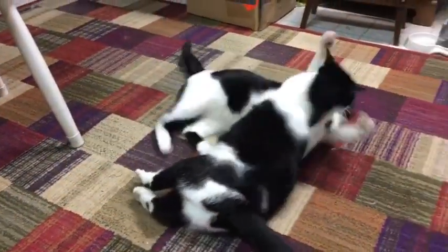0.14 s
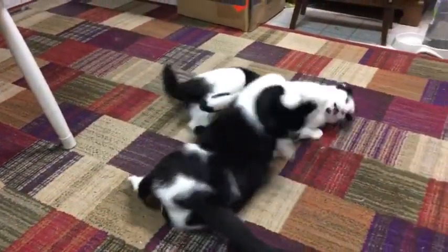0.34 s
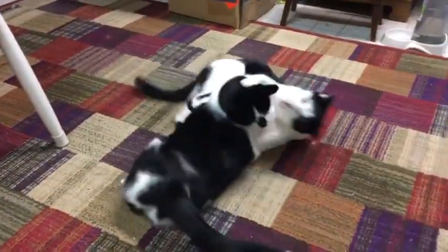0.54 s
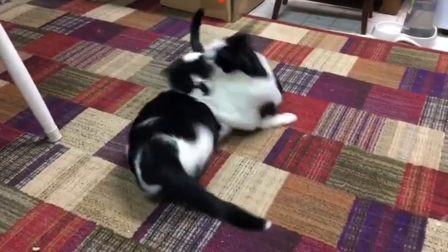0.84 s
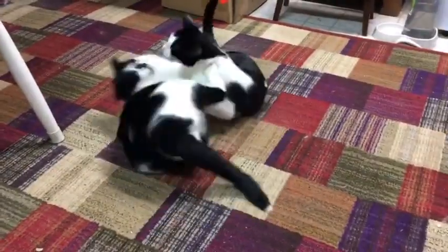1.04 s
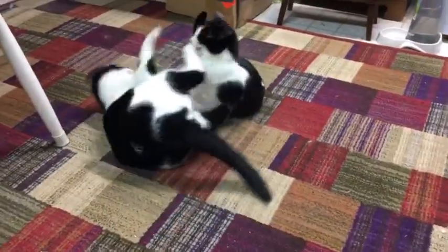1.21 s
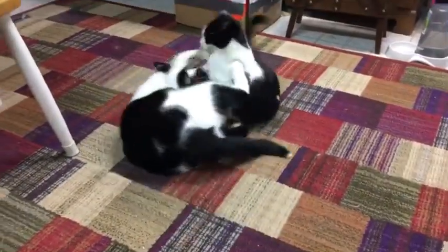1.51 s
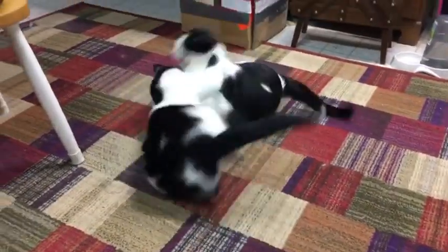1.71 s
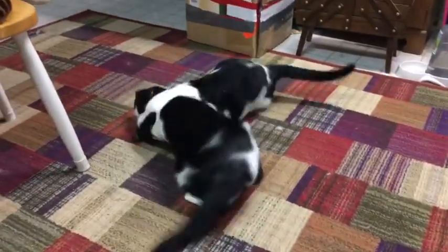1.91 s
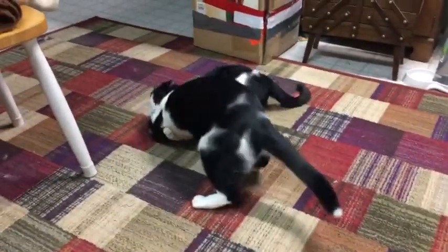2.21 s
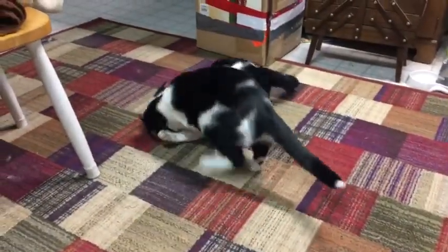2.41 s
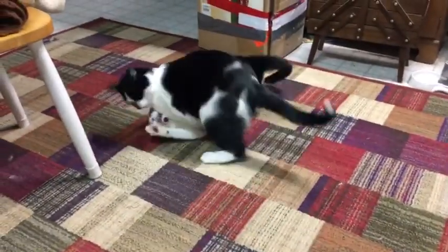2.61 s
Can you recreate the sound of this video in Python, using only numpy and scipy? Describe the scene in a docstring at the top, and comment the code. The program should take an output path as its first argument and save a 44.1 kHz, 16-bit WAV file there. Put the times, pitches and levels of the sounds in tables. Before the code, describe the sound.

Wrestling cats thud softly on a carpeted floor, strongest near the start; claw snaps and scratchy drags follow around one second and again later, over low room rumble and faint hiss, single-channel handheld microphone.

```python
"""Two cats wrestle on a rug in a quiet room: bodies and paws thud softly as short low swings that
ring the floor boards, and rolling bodies add filtered-noise rumble. Fur brushes past as soft noise.
Claws tear loose in damped sine snaps, drag through the pile as a crackle of random impulses, and
click as bright noise bursts. Thuds and claws get a short room tail over a steady rumble and hiss."""
import sys
import numpy as np
from scipy import signal
from scipy.fft import rfft, irfft
from scipy.io import wavfile

SR = 44100
rng = np.random.default_rng(int(sys.argv[2]) if len(sys.argv) > 2 else 0)


def dump(signal):
    """Clip the signal to [-1, 1] and save it as 16-bit WAV at the path in sys.argv[1]."""
    limited = np.clip(np.atleast_2d(signal).T, -1, 1)
    pcm = np.round(limited * 32767).astype(np.int16)
    wavfile.write(sys.argv[1], SR, pcm)


N = 121275

# Tone of the quiet room, before rumble and hiss are split and levelled: [f/Hz, level/dB]
ROOM_TONE = [(20, -13.5), (30, -17.5), (40, -1.5), (51, 10), (75, 3), (118, -5.5), (146, -5.5),
             (200, -13.5), (271, -14.5), (373, -19), (450, -23.5), (833, -28), (1120, -25.5), (1540, -29.5),
             (3010, -31.5), (5010, -38), (6500, -37.5), (15000, -43.5)]
# Bodies and paws landing at varied pitches and levels, with two quick echoes of the big landing at 0.228 s (the
# rows at 0.2431 and 0.255 s), before the floor colours them: [t/s, f/Hz, peak level/dB]
LANDINGS = [(0.01, 70, -47.5), (0.033, 65.8, -45.5), (.228, 185.3, -22), (0.2431, 161, -29.5),
            (0.255, 183, -28), (.297, 111.7, -52), (.321, 204, -45.5), (0.335, 175, -43.5),
            (0.174, 190, -57), (.402, 88, -52.5), (0.491, 177, -55.5), (0.754, 257, -52),
            (0.813, 193, -48.5), (0.844, 83, -54.5), (.972, 232, -52), (1.023, 237, -44), (1.034, 169, -51),
            (1.705, 128, -46), (1.7195, 263, -41.5), (1.737, 94.4, -48.5), (1.776, 83.3, -51),
            (1.801, 125, -44.5), (1.8187, 87.2, -38.5), (1.841, 148.2, -51), (1.873, 85.6, -57.5),
            (1.931, 250, -47.5), (1.939, 80.4, -49), (2.09, 141, -57), (2.111, 140, -58.5),
            (2.231, 53.5, -61), (2.451, 305.6, -47.5), (2.458, 144, -42.5), (2.486, 96.4, -43),
            (2.499, 133, -48.5), (2.512, 114, -50.5), (2.592, 91, -57), (2.676, 272, -59)]
# Bodies rolling and shoving, before the floor colours them: [peak t/s, rise t/s, fall t/s, level/dB]
ROLLS = [(.02, 0.07, 0.017, -64.5), (.47, 0.039, 0.2, -68), (0.801, 0.063, 0.047, -61.5),
         (1.009, 0.022, .02, -55), (1.71, 0.032, 0.054, -54.5), (1.85, 0.069, 0.055, -62),
         (2.5, 0.021, .03, -69)]
# Spectrum of the rolling: [f/Hz, level/dB]
ROLL_COLOUR = [(30, -19), (60, -5), (160, 0.5), (220, -5.5), (280, -0.5), (380, -8), (480, -18.5),
               (1000, -24.5), (3000, -50.5)]
# How the floor carries landings and rolling: [f/Hz, level/dB]
FLOOR_COLOUR = [(30, -2.5), (55, 3), (100, 1), (130, 1), (160, 0), (200, 0.5), (240, -1.5), (280, -8.5),
                (315, -1), (370, 0.5), (600, -0.5)]
# Ringing floor boards under the rug, levels relative to each other: [f/Hz, level/dB, 60 dB decay t/s]
FLOOR_MODES = [(54, -4.5, 0.28), (72.62, -9, 0.54), (85, -10.5, 0.14), (126.1, -6.5, 0.12),
               (156.4, -14, 0.64), (202.26, -5.5, 0.31), (241, -1, 0.38), (336, -7, 0.083),
               (388.4, -13, 0.16)]
# Fur sliding on fur and rug: [peak t/s, rise t/s, fall t/s, level/dB]
BRUSHES = [(.03, 0.056, 0.22, -74), (.17, 0.023, 0.033, -74.5), (0.361, 0.041, .05, -73),
           (.58, 0.021, 0.078, -73.5), (1.42, 0.105, 0.069, -76), (1.68, 0.062, 0.04, -72),
           (2.19, 0.065, 0.096, -79), (2.382, 0.011, 0.017, -70), (2.62, 0.23, 0.33, -77.5)]
# Spectrum of the brushing: [f/Hz, level/dB]
FUR_COLOUR = [(300, 1), (1000, 1.5), (3000, -1), (5000, -8), (9000, -12.5), (15000, -22.5)]
# One long slide over the rug that swells and stops: [t/s, level/dB]
SLIDE = [(.7, -90), (.85, -73.5), (.99, -71), (1.05, -83)]
# Spectrum of the slide: [f/Hz, level/dB]
SLIDE_COLOUR = [(1500, 12), (4000, 4), (9000, 4.5), (15000, -5.5)]
# Claws snapping free of threads, before the rug colours them: [t/s, level/dB, f/Hz]
SNAPS = [(.7225, -49.5, 1980), (.735, -49.5, 1670), (.749, -63, 1700), (.752, -45.5, 1380),
         (0.7882, -46, 1930), (0.794, -66, 2000), (.923, -45.5, 1800), (.946, -54, 1400),
         (.9655, -44, 1112), (.9712, -48.5, 720), (0.9794, -41, 1080), (0.9909, -41, 1390),
         (0.995, -45, 1190), (1.002, -53, 1110), (1.009, -38.5, 1440), (1.021, -51.5, 1070),
         (1.0288, -49, 910), (1.663, -49, 1580), (1.6768, -39, 2760), (1.6815, -67, 2200),
         (1.6888, -46.5, 2170), (1.7085, -44, 1160), (1.72, -48.5, 860), (1.769, -54, 1300),
         (1.79, -50.5, 2000), (1.875, -67, 1017), (2.479, -60, 1950), (2.668, -60, 690)]
# Paws dragging through the pile, before the rug colours them:
# [peak t/s, rise t/s, fall t/s, level/dB, centre f/Hz]
DRAGS = [(.738, 0.016, 0.031, -65, 2080), (.794, 0.0058, .03, -64.5, 1840), (.845, 0.0092, 0.018, -71, 990),
         (.94, 0.017, .025, -63.5, 1880), (0.996, 0.023, 0.038, -61.5, 950),
         (1.451, 0.0085, 0.0087, -64.5, 2870), (1.655, 0.016, 0.024, -65.5, 1400),
         (1.682, 0.0046, 0.021, -60, 2370), (1.715, 0.0085, 0.034, -72, 740),
         (1.78, 0.0272, 0.044, -67.5, 1410), (1.88, 0.007, .015, -68, 2520),
         (2.348, 0.025, 0.014, -71, 1314), (2.729, 0.0077, 0.018, -64.5, 2410)]
# What the rug lets out of snaps and drags: [f/Hz, level/dB]
RUG_COLOUR = [(100, 3), (250, -8), (600, 8), (800, 0.5), (1400, 2.5), (2000, -0.5), (3000, -2.5),
              (4000, -6.5), (4900, -13), (7000, -14.5), (15000, -17.5)]
# Claw tips clicking, noise level before the high-pass: [t/s, level/dB]
TICKS = [(.9898, -58), (1.0085, -53.5), (1.257, -53.5), (1.6759, -62), (1.6823, -62), (1.6914, -58),
         (2.384, -76), (2.553, -62.5), (2.634, -61)]

RUMBLE_DB, HISS_DB, SPLIT_HZ = -66.5, -74, 330
PUSH_CYCLES = 0.65  # half-width of a landing's swing, in cycles of its pitch
KNOCK_HZ, KNOCK_S, KNOCK_DB = 387, 0.0023, -26.5  # level relative to the landing
RING_DB, THUMP_ROOM_DB, THUMP_T60_S = -57, -7, 0.29
SNAP_CYCLES = 1  # cycles in which a twang falls to 1/e
SCUFF_S, SCUFF_DB = 0.0018, -6.5  # level relative to the snap
CLAW_OCTAVES = 1.93  # bandwidth of scuffs and drags
THREADS_PER_S, THREAD_SPREAD_DB = 1500, 4.5
CLAW_ROOM_DB, TICK_ROOM_DB, CLAW_T60_S = -5.5, -8, 0.22
TICK_S, TICK_HZ = 0.00039, 3900  # decay time, high-pass corner
TOP_HZ = 15300


def undb(db):
    """Decibels to gain."""
    return 10 ** (np.asarray(db) / 20)


def unit(x):
    """Scale to rms 1."""
    return x / np.sqrt(np.mean(x ** 2))


def noise():
    """White noise for the whole scene."""
    return rng.standard_normal(N)


def convolve(x, response):
    """Pass a sound through an impulse response."""
    return signal.fftconvolve(x, response)[:N]


def colour(x, points):
    """Minimum-phase filter through (Hz, dB) points, interpolated over log frequency."""
    size = 8192
    hz, db = np.array(points, float).T
    bins = np.fft.rfftfreq(size, 1 / SR) + 1  # the offset avoids log(0)
    gain = undb(np.interp(np.log(bins), np.log(hz), db))
    # Folding the cepstrum forward makes the response causal
    cepstrum = irfft(np.log(gain))
    cepstrum[1:size // 2] *= 2
    cepstrum[size // 2 + 1:] = 0
    return convolve(x, irfft(np.exp(rfft(cepstrum))))


def cut(x, hz, kind, order=2):
    """Butterworth low-pass, high-pass or band-pass."""
    return signal.sosfilt(signal.butter(order, hz, kind, fs=SR, output="sos"), x)


def band(x, hz, octaves):
    """Broad resonance around a centre."""
    edges = hz * 2 ** (np.array([-.5, .5]) * octaves)
    return cut(x, np.minimum(edges, SR / 2 - 1), "band", order=1)


def room(x, t60, wet_db, build_s):
    """Direct sound plus a diffuse tail that builds up and dies away."""
    t = np.arange(N) / SR
    decay = np.exp(-np.log(1000) * t / t60)
    build = 1 - np.exp(-(t / build_s) ** 2)
    tail = noise() * decay * build
    return x + undb(wet_db) * convolve(x, tail / np.sqrt(np.sum(tail ** 2)))


def swells(t, table):
    """Level of strokes that each rise to a peak and fall away, summed as power."""
    power = np.zeros(len(t))
    for at, rise, fall, db in table:
        exponent = np.where(t < at, ((at - t) / rise) ** 2 / 2, (t - at) / fall)
        power += (undb(db) * np.exp(-exponent)) ** 2
    return np.sqrt(power)


def room_tone():
    """Steady low rumble and faint hiss: coloured noise either side of a split frequency."""
    rumble = unit(cut(colour(noise(), ROOM_TONE), SPLIT_HZ, "low"))
    hiss = unit(cut(colour(noise(), ROOM_TONE), SPLIT_HZ, "high"))
    return undb(RUMBLE_DB) * rumble + undb(HISS_DB) * hiss


def thumps(t):
    """Padded landings rock the floor with a faint knock; rolling rumbles; the boards ring briefly."""
    push = unit(colour(noise(), ROLL_COLOUR)) * swells(t, ROLLS)
    for at, hz, db in LANDINGS:
        near = np.abs(t - at) < 10 / hz
        age = t[near] - at
        rocking = np.cos(2 * np.pi * hz * age) * np.exp(-(hz * age / PUSH_CYCLES) ** 2)
        # The knock starts just ahead and peaks with the landing
        since = np.maximum(age / KNOCK_S + 1, 0)
        knock = np.cos(2 * np.pi * KNOCK_HZ * age) * since * np.exp(1 - since)
        push[near] += undb(db) * (rocking + undb(KNOCK_DB) * knock)
    push = colour(push, FLOOR_COLOUR)
    boards = np.zeros(N)
    for hz, db, t60 in FLOOR_MODES:
        boards += undb(db) * np.cos(2 * np.pi * hz * t) * np.exp(-np.log(1000) * t / t60)
    ringing = undb(RING_DB) * convolve(push, boards)
    return room(push + ringing, THUMP_T60_S, THUMP_ROOM_DB, build_s=0.011)


def fur(t):
    """Coats brush as soft swelling noise, with one longer, brighter slide."""
    brushes = unit(colour(noise(), FUR_COLOUR)) * swells(t, BRUSHES)
    at, db = np.array(SLIDE).T
    sliding = (t > at[0]) & (t < at[-1])
    slide_level = undb(np.interp(t, at, db)) * sliding
    slide = unit(colour(noise(), SLIDE_COLOUR)) * slide_level
    return brushes + slide


def claw_snaps(t):
    """A thread let go gives a damped twang and a short noisy scuff around the same pitch."""
    snaps = np.zeros(N)
    age = t[:SR // 20]
    for at, db, hz in SNAPS:
        twang = np.sin(2 * np.pi * hz * age) * np.exp(-hz * age / SNAP_CYCLES)
        grain = unit(band(rng.standard_normal(len(age)), hz, CLAW_OCTAVES))
        scuff = grain * np.exp(-age / SCUFF_S)
        start = int(at * SR)
        snaps[start:start + len(age)] += undb(db) * (twang + undb(SCUFF_DB) * scuff)
    return snaps


def claw_drags(t):
    """Many threads plucked at random, as impulses of uneven size, crackle around each drag's pitch."""
    signs = rng.choice([-1, 1], N)
    spread = np.minimum(rng.exponential(size=N), 3)
    sizes = signs * undb(THREAD_SPREAD_DB * spread)
    threads = (rng.random(N) < THREADS_PER_S / SR) * sizes
    drags = np.zeros(N)
    for at, rise, fall, db, hz in DRAGS:
        drags += unit(band(threads, hz, CLAW_OCTAVES)) * swells(t, [(at, rise, fall, db)])
    return drags


def claws(t):
    """Snaps and the crackle of drags, coloured by the rug and followed by the room's tail."""
    rug = colour(claw_snaps(t) + claw_drags(t), RUG_COLOUR)
    return room(rug, CLAW_T60_S, CLAW_ROOM_DB, build_s=0.001)


def ticks(t):
    """Claw tips click: tiny high-passed noise bursts that start at once and decay."""
    level = np.zeros(N)
    for at, db in TICKS:
        level += undb(db) * (t >= at) * np.exp(-np.abs(t - at) / TICK_S)
    # The tiny offset keeps the filter clear of vanishingly small numbers
    clicks = cut(noise() * level + 1e-18, TICK_HZ, "high", order=1)
    return room(clicks, CLAW_T60_S, TICK_ROOM_DB, build_s=0.0034)


def scene():
    """The scuffle in the room, one channel."""
    t = np.arange(N) / SR
    mix = thumps(t) + claws(t) + ticks(t) + fur(t) + room_tone()
    return mix[None]


def record(dry):
    """The recorder cuts the top with a steep elliptic low-pass."""
    return signal.sosfilt(signal.ellip(8, .2, 60, TOP_HZ, fs=SR, output="sos"), dry)


dry = scene()
out = record(dry)
dump(out)
```